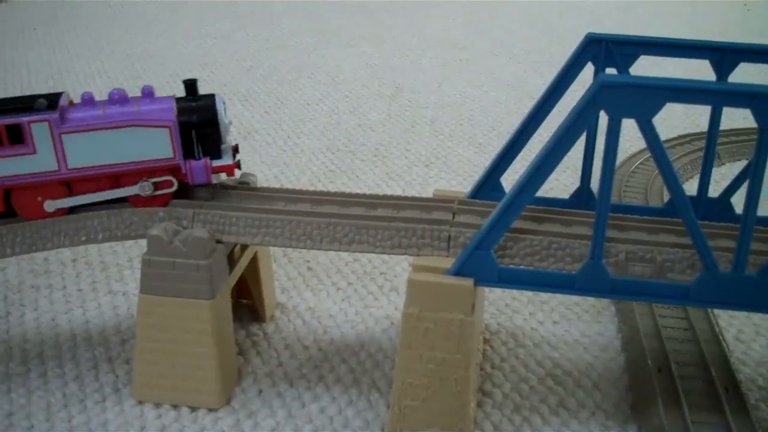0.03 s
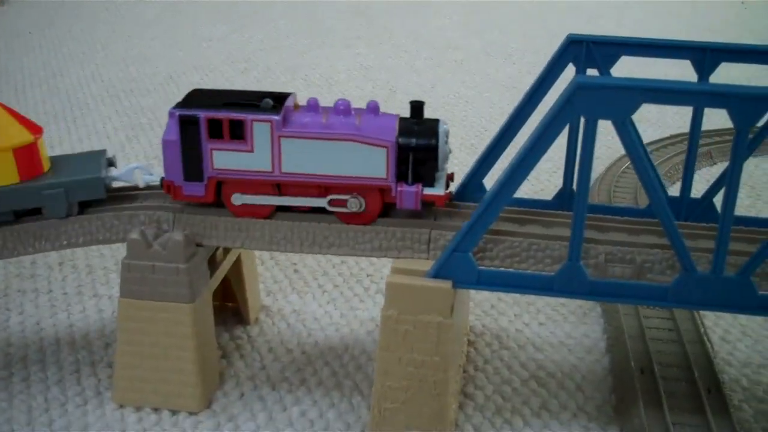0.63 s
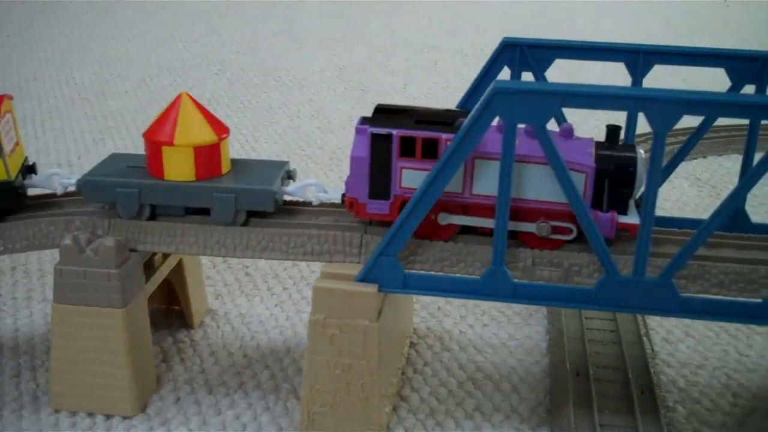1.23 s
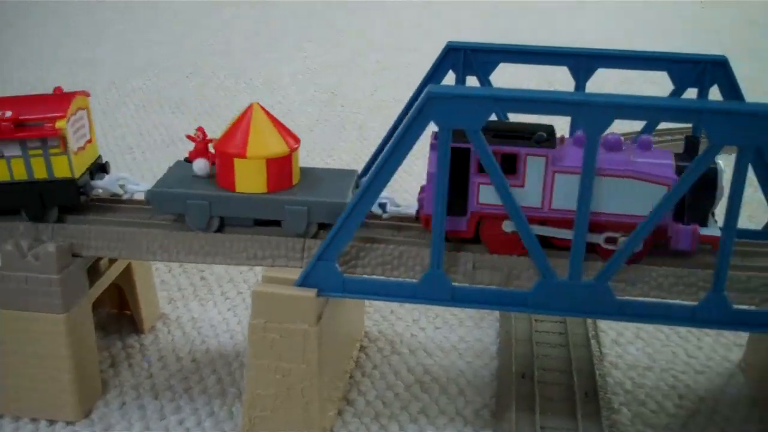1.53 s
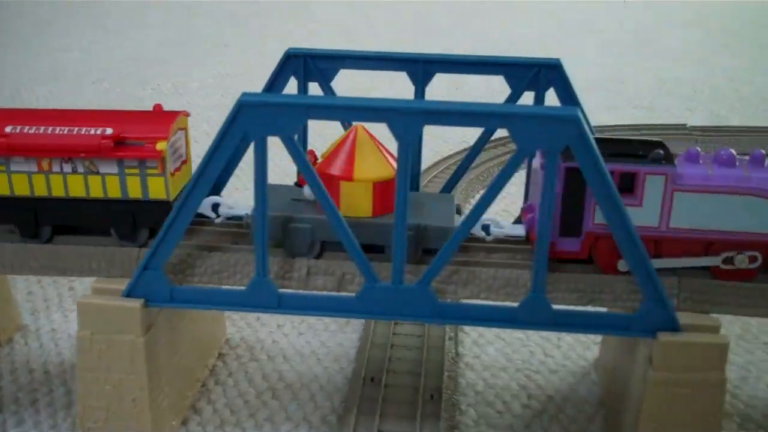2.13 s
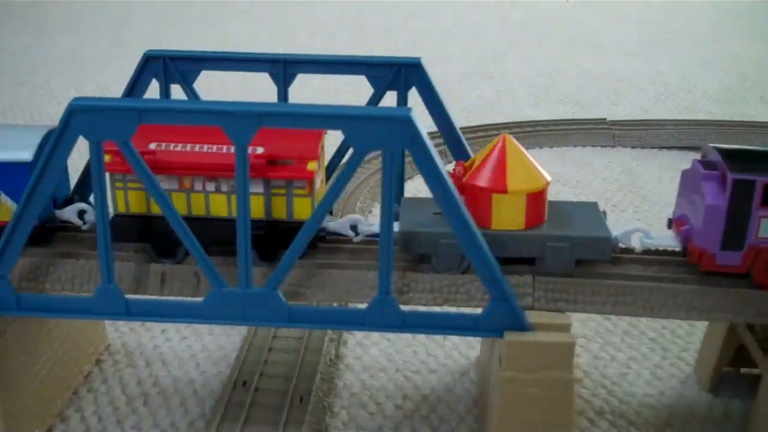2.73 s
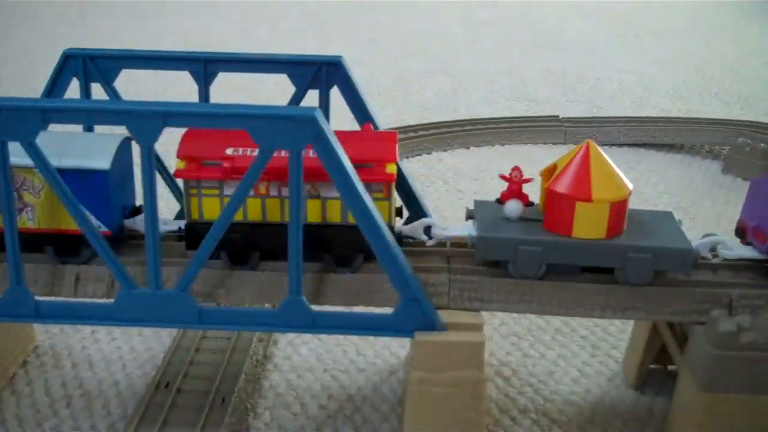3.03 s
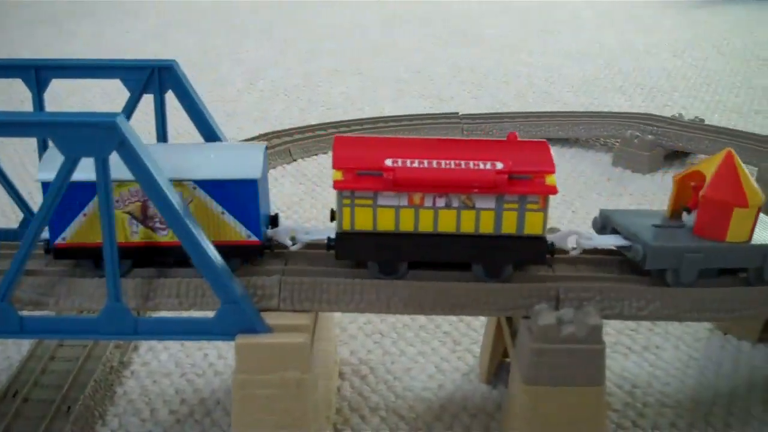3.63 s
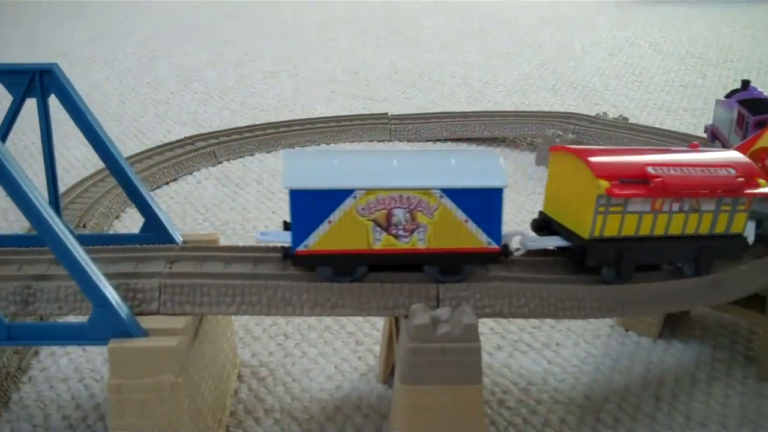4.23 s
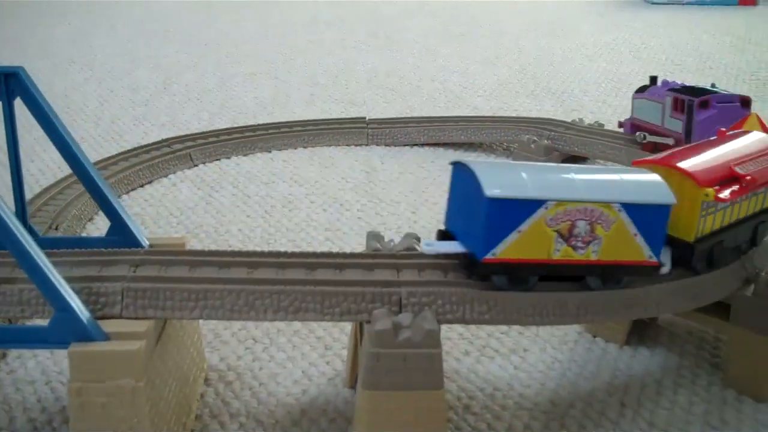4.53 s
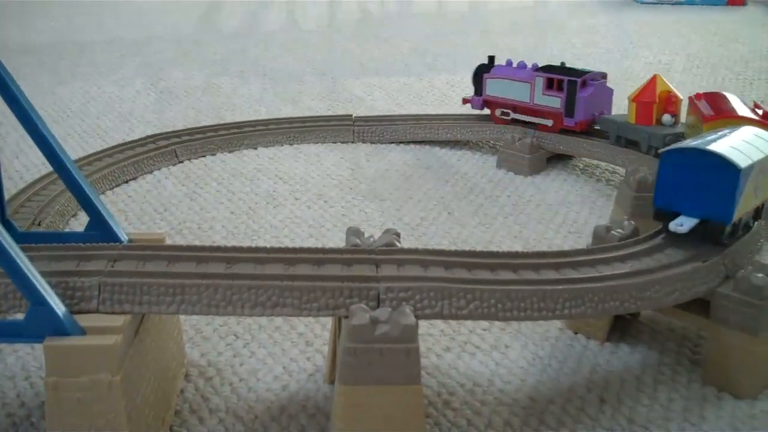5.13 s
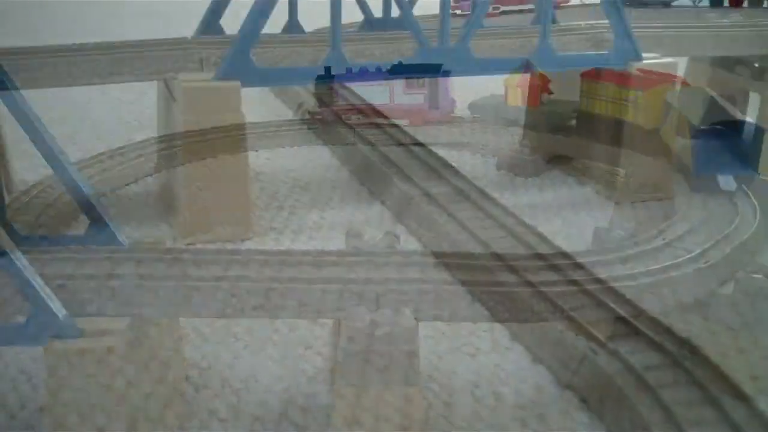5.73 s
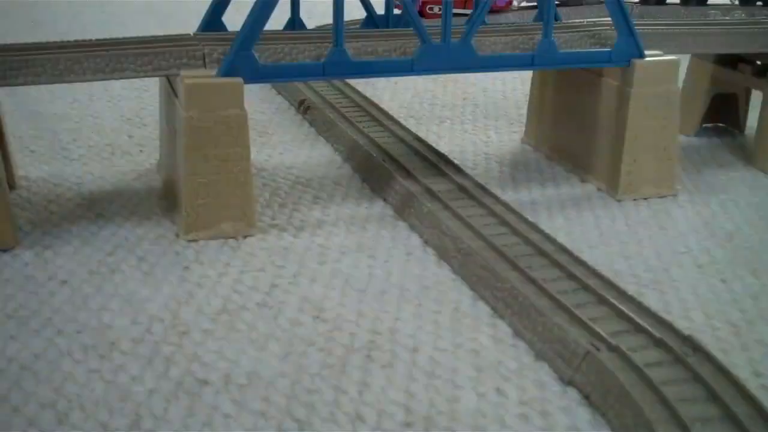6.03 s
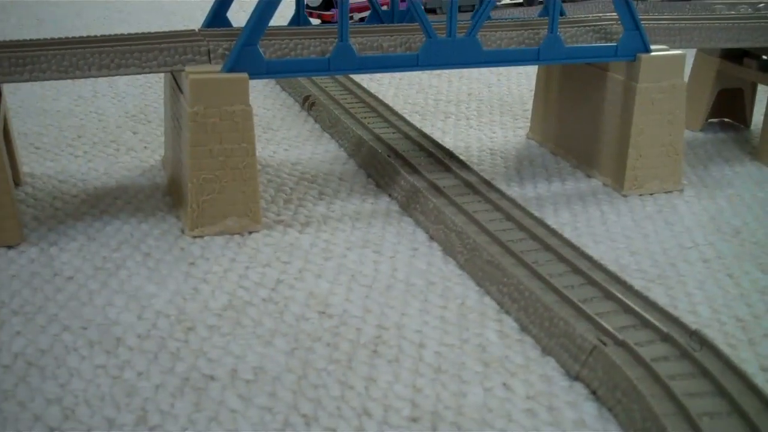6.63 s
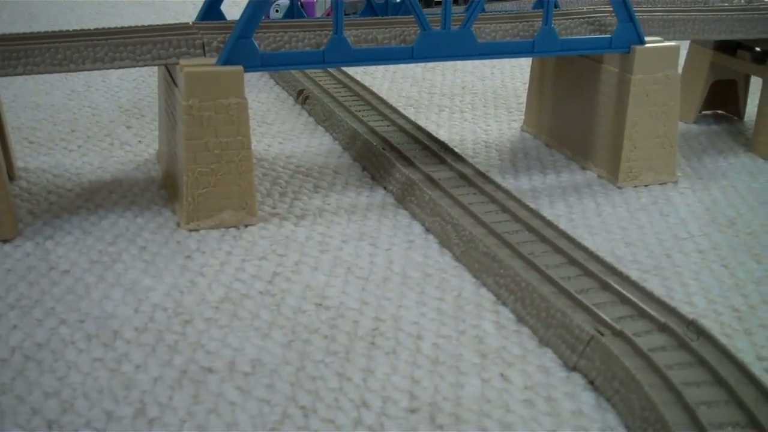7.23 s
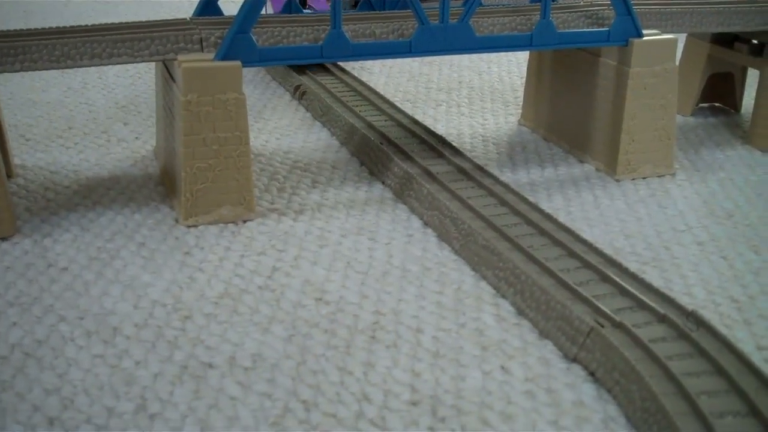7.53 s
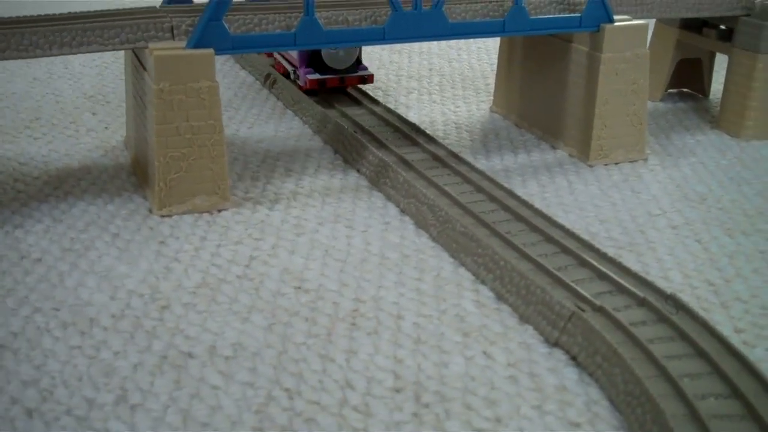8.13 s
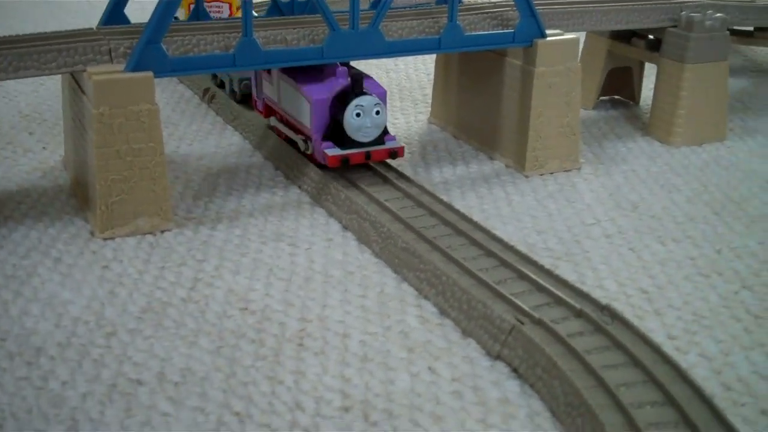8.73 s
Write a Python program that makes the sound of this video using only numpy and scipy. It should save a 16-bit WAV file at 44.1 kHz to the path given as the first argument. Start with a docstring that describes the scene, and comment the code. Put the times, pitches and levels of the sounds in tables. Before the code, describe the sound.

A battery toy train runs on plastic track, close to the microphone in a small carpeted room. At first its gears chatter brightly with a faint, wavering whine over the hollow drone of the track. Then the wagons rattle past, their couplings and wheels clacking irregularly. The wheels grind and tick through a bend, and the train draws away and carries on more quietly, with a few light clicks.

```python
"""A small carpeted room, close to a toy railway bridge.
A battery engine pulls three plastic wagons over it, rounds a bend and comes back underneath.
The hollow track drones; wheels grind on the ribbed rails and flanges tick in the bend.
Up front, loose gear teeth chatter and whine, couplings rattle and the train clacks over the joints.
The rattles and hums are showers of tiny impacts ringing plastic parts."""
import sys
import numpy as np
from scipy import signal
from scipy.fft import rfft, irfft
from scipy.io import wavfile
from scipy.ndimage import uniform_filter1d, minimum_filter1d

SR = 44100
rng = np.random.default_rng(int(sys.argv[2]) if len(sys.argv) > 2 else 0)


def put_to_file(sound):
    """Save the sound as 16-bit audio at rate SR, in the file named by the first command-line argument."""
    columns = np.atleast_2d(sound).T  # one column per channel
    safe = np.clip(columns, -1, 1)
    whole_steps = np.round(safe * 32767)
    wavfile.write(sys.argv[1], SR, whole_steps.astype(np.int16))


N = 396900
TIME = np.arange(N) / SR

# tone curves: f/Hz, level/dB
ROOM_TONE_EQ = [(20, -1), (60, -11), (120, 4), (200, -4), (1000, -22), (8000, -39)]
TRACK_EQ = [(80, -41), (170, -11.5), (260, -2.5), (380, 2.5), (560, -1), (700, 1), (900, -9.5),
            (1100, -0.5), (1400, -2), (2200, 0.5), (6000, -57)]
RAIL_EQ = [(700, -36.5), (1400, -6.5), (1900, -2), (2200, 1), (2600, -0.5), (2950, -0.5), (3400, 2),
           (4100, -1), (4900, 3.5), (5800, -1.5), (8000, -43), (14000, -66)]
WAGON_EQ = [(200, -59), (1200, -29), (2500, -8), (4200, -12), (5400, -7.5), (6200, -4), (6900, -0.5),
            (7500, -1.5), (8200, -4.5), (9200, -13.5), (10500, -19.5), (12000, -36.5), (14000, -41.5)]
# stereo tilt, the right microphone shaded in the treble: f/Hz, left minus right/dB
BALANCE = [(400, 0), (750, -1.5), (1200, 2.5), (2000, 3.5), (3200, 3.5), (4500, 3), (7000, 6), (8600, 3.5),
           (10500, 6.5), (13000, 18.5)]

# resonances of the parts: f/Hz, width/Hz, level/dB
BRIDGE_MODES = [(856, 165, -1.5), (1060, 71, -0.5)]
FRAME_MODES = [(2570, 280, -0.5), (3560, 130, -3.5)]
FLANGE_MODES = [(2570, 110, 1.5), (3540, 210, 1), (4680, 340, 0.5), (10430, 360, -6.5)]
HOOK_MODES = [(2610, 140, -0.5), (3700, 600, -6), (6100, 1040, -1.5), (7400, 840, 0.5)]
SHELL_MODES = [(1158, 75, 3.5), (1302, 37, -0.5), (2152, 240, -0.5)]
NOSE_MODES = [(1628, 143, 0)]
GEARBOX_MODES = [(3650, 270, -14.5), (5700, 370, -9.5), (6440, 370, -2), (6970, 440, 1.5),
                 (7730, 740, -7.5), (7950, 360, -8)]

# fader rides: t/s, level/dB
DRONE_FADER = [(0, -39.5), (2.4, -40), (4.7, -37.5), (5.6, -42), (9, -39.5)]  # track and piers, softer with the train behind the bridge
BRIDGE_FADER = [(1.8, -45), (2.6, -41), (5, -40.5), (6.4, -52.5)]  # up while the train is on it
ROLL_FADER = [(0, -28.5), (.8, -27), (1.2, -26), (2.2, -24.5), (3.6, -28.5), (4.2, -27), (4.85, -22.5),
              (5.4, -31), (6.9, -36), (8.4, -34.5), (9, -33)]  # wheels grind hardest in the bend
FRAME_FADER = [(0, -46), (2.5, -31), (4.7, -28.5), (5.4, -53), (6.4, -38), (9, -59)]  # wagon frames passing close
SHELL_FADER = [(0, -41.5), (2.6, -41), (5.85, -43.5), (6.25, -37), (9, -35.5)]  # up when the engine faces the listener
NOSE_FADER = [(0, -47.5), (2.7, -42), (5.5, -44), (7.2, -41), (8.8, -37)]  # up as the engine emerges from under the bridge
CHATTER_FADER = [(0, -16.5), (.8, -17), (1.6, -18.5), (2.2, -19.5), (2.6, -22), (3.3, -23.5), (4.0, -23.5),
                 (4.5, -22.5), (5.0, -23), (5.45, -28.5), (6.3, -29.5), (7.4, -30.5), (8.4, -31.5),
                 (9, -28.5)]  # gears and rattle fade as the train draws away
REVERB_SEND = [(0, -2), (4, -8), (6, -5), (9, -3)]  # driest with the train nearest

# drive speed, slow on the climb: t/s, gear rate/Hz
GEAR_SPEED = [(0, 55.5), (.1, 53.6), (.28, 52.1), (.5, 54.4), (.62, 58.5), (.9, 57.8), (1.4, 60.3),
              (1.7, 61.4), (2.2, 60.7), (4.5, 59.5), (6.2, 62.5), (9, 60.5)]
# how unevenly the wagons shake: t/s, spread/dB
SHAKE = [(0, 2.7), (2.3, 4.5), (3.6, 6.2), (4.7, 5.3), (9, 3.0)]
# crossfade as the engine passes, then the wagons: t/s, gears' share of the chatter/0-1
GEAR_SHARE = [(0, 0.82), (1.2, 0.83), (2.2, 0.5), (2.8, 0.1), (6, 0), (9, 0.21)]
# bearing of the train: t/s, left lag/samples
BEARING = [(0, -0.5), (2.2, 2), (3.5, 2.5), (6, 3.5), (9, 1)]

# couplings snatch (+) or go slack (-): start/s, length/s, rattle change/dB
JERKS = [(0.227, 0.087, 2), (0.544, 0.043, -1.5), (0.64, 0.11, 2), (1.595, 0.028, -7),
         (1.723, 0.028, -10.5), (2.433, 0.032, -3), (2.492, 0.072, 3.5), (2.905, 0.11, 2.5),
         (3.14, 0.064, 4), (3.37, 0.093, 4), (3.534, 0.019, -10.5), (3.548, 0.023, 6.5),
         (3.898, 0.037, 5.5), (4.094, 0.078, 4.5), (4.185, 0.039, -5), (4.426, 0.063, 3),
         (4.55, 0.036, 4.5), (4.622, 0.043, -5), (5.193, 0.053, -8), (5.312, 0.065, 2.5), (6.3, 0.1, -4),
         (7.65, 0.077, -2.5), (8.016, 0.025, -10), (8.91, 0.056, 4)]
# wheels rub along a rail: middle/s, half length/s, f/Hz, level/dB
RUBS = [(1.132, 0.25, 3120, -28.5), (4.534, .14, 10370, -34.5), (6.42, 0.33, 3850, -36)]
# clacks of wheels and couplings: t/s, level/dB, f/Hz
CLACKS = [(1.5722, -5, 6380), (1.888, -5, 7400), (1.9199, -1.5, 6900), (1.9987, -2.8, 6820),
          (2.2731, 0, 7380), (2.3419, -4, 7210), (2.3733, -4.5, 7150), (2.392, -7, 3100), (2.405, -6, 3300),
          (2.5784, -3.5, 6840), (2.8213, -4.5, 6740), (2.9455, -5, 5800), (2.973, -4.5, 6610),
          (2.989, -5, 6900), (3.0304, -3.5, 7170), (3.1231, -3, 6850), (3.2239, -4, 6750),
          (3.2309, -3, 7340), (3.3451, -1, 6900), (3.396, -5, 6800), (3.5153, -1.5, 6300),
          (3.6335, -7, 6350), (3.644, -4.5, 6620), (3.7138, -6, 6800), (3.7542, -1.5, 6400),
          (3.8151, -4, 7300), (3.9193, -4, 6170), (3.9328, -3.5, 7000), (3.946, -5, 6900),
          (4.067, -5.5, 6830), (4.1274, -5, 6550), (4.1488, -3.5, 6850), (4.162, -5, 7300),
          (4.3114, 0.5, 6890), (4.329, -4.5, 7100), (4.4038, -7, 4710), (4.5873, -3.5, 7000),
          (4.754, -9, 2570), (4.9351, -9, 2570), (4.9885, -5, 4690), (5.1765, -2.8, 7000),
          (5.5546, -10, 6500), (7.2064, -14, 6260), (7.933, -14, 5900), (8.1562, -13.5, 2900),
          (8.3097, -13, 6820), (8.4429, -13.5, 5210), (8.6589, -13, 4700), (8.7427, -12, 6830)]
# gears sing under load: middle/s, half length/s, harmonic of the tooth rate, level/dB
SQUEALS = [(.24, 0.48, 3, -33), (.26, 0.43, 4, -32), (0.266, 0.049, 4, -28), (0.273, 0.088, 2, -31),
           (.29, .08, 6, -27.5), (.64, 0.061, 2, -33.5), (0.848, .12, 2, -36), (1.66, 0.2, 2, -30.5),
           (2.03, 0.23, 2, -34), (7.498, .13, 2, -37), (7.98, 0.27, 2, -41.5)]

TEETH = 18
ROLL_FOLLOWS, TRACK_FOLLOWS, SHELL_FOLLOWS = 0.63, 0.12, 0.64  # share of a jerk's dB each one gets
GEAR_LURCH_DB, RATTLE_LURCH_DB, TRACK_LURCH_DB = 0.8, 1.37, 2.5  # the heavy engine lurches least


def from_db(db):
    return 10 ** (np.asarray(db) / 20)


def unit_rms(x):
    return x / np.sqrt(np.mean(x ** 2) + 1e-20)


def ride(curve):
    """An automation curve at every sample."""
    return np.interp(TIME, *np.transpose(curve))


def swell(middle_s, half_s, edge_db=-9):
    """A bell-shaped fade in and out."""
    return from_db(edge_db * np.minimum(((TIME - middle_s) / half_s) ** 2, 10))


def drift(rate):
    """Smooth random wobble of unit spread, changing about rate times a second."""
    r = np.exp(-20 * np.pi * rate / SR)
    slow = signal.lfilter([1], [1, -2 * r, r * r], rng.standard_normal(N // 10 + 4002))[4000:]
    return np.interp(np.arange(N) / 10, np.arange(len(slow)), unit_rms(slow))


def bandpass(x, low_hz, high_hz, order=2):
    return signal.sosfilt(signal.butter(order, [low_hz, high_hz], "band", fs=SR, output="sos"), x)


def eq(x, curve, size=4096):
    """Minimum-phase EQ that follows a tone curve."""
    hz, db = np.transpose(curve)
    grid = np.maximum(np.fft.rfftfreq(size, 1 / SR), 1)
    cepstrum = irfft(np.log(from_db(np.interp(np.log(grid), np.log(hz), db))))
    cepstrum[1:size // 2] *= 2
    cepstrum[size // 2 + 1:] = 0
    return signal.oaconvolve(x, irfft(np.exp(rfft(cepstrum))))[:N]


def resonate(x, modes):
    """Parallel resonators of alternating polarity."""
    out = 0
    for k, (hz, width, db) in enumerate(modes):
        r = np.exp(-np.pi * width / SR)
        poles = [1, -2 * r * np.cos(2 * np.pi * hz / SR), r * r]
        ring = signal.lfilter([1, 0, -1], poles, x + 1e-18)
        out = out + (-1) ** k * from_db(db) * (1 - r * r) / 2 * ring
    return out


def contacts(per_s, spread_db):
    """Tiny impacts at random moments with uneven sizes."""
    sizes = from_db(spread_db * np.clip(rng.standard_normal(N), -2, 2)) * rng.choice([-1, 1], N)
    return sizes * (rng.random(N) < per_s / SR)


def steady(x, size=2600):
    """Levels a texture over some 60 ms and keeps its grain."""
    return x / np.sqrt(np.maximum(uniform_filter1d(x * x, size), 0) + 1e-12)


def small_parts(clicks, low_hz, high_hz, width_hz, count=24):
    """Each click lands on one of many small parts, each with its own pitch."""
    at = np.flatnonzero(clicks)
    part = rng.integers(0, count, len(at))
    out = np.zeros(N)
    for k, hz in enumerate(np.linspace(low_hz, high_hz, count)):
        own = np.zeros(N)
        own[at[part == k]] = clicks[at[part == k]]
        out += resonate(own, [(hz, width_hz, 0)])
    return unit_rms(out)


def hum(modes, jolt_db):
    """A hollow body shaken by the rolling."""
    knocks = contacts(per_s=2000, spread_db=2.5) * from_db(0.35 * jolt_db)
    softened = eq(knocks, [(300, -8.5), (800, -2), (2800, 0.0), (6000, -13.5)])
    return steady(resonate(softened, modes))


def jerks(ramp_s=0.032):
    """The rattle's change in dB as each jerk builds and lets go."""
    return sum(db * np.clip(np.minimum(TIME - s, s + length - TIME) / ramp_s + .5, 0, 1)
               for s, length, db in JERKS)


def place(x, lag, send_db, room_t60_s=0.44, early_t60_s=0.017, size=8192):
    """Direct sound at two close microphones, plus reflections that shift as the train moves on."""
    left = np.interp(4 * (np.arange(N) - lag), np.arange(4 * N), signal.resample_poly(x, 4, 1))
    t = TIME[:size]
    fade = (from_db(-60 * t / room_t60_s) + 5.1 * from_db(-60 * t / early_t60_s)) * (t > .0006)
    fade /= np.linalg.norm(fade)
    window = np.sin(np.pi * np.arange(size) / size)
    padded, room = np.pad(x, size), np.zeros((2, N + 3 * size))
    for i in range(0, N + size, size // 2):
        echoes = rng.standard_normal((2, size)) * fade
        grain = padded[i:i + size] * window
        room[:, i:i + 2 * size] += irfft(rfft(grain, 2 * size) * rfft(echoes, 2 * size))
    wet = from_db(send_db)
    return (np.array([left, x]) + wet * room[:, size:size + N]) / np.sqrt(1 + wet ** 2)


def room_tone():
    """A faint, dark bed of air."""
    return from_db(-68.5) * unit_rms(eq(rng.standard_normal(N), ROOM_TONE_EQ))


def track_drone():
    """Rolling impacts blur into a drone in the hollow track and a hum in the bridge."""
    drone = unit_rms(eq(contacts(per_s=5000, spread_db=2.0), TRACK_EQ))
    return from_db(ride(DRONE_FADER)) * drone + from_db(ride(BRIDGE_FADER)) * hum(BRIDGE_MODES, 0)


def engine_body(jolt_db):
    """The engine's shell and nose hum with a wavering level."""
    shell = from_db(ride(SHELL_FADER)) * hum(SHELL_MODES, jolt_db)
    nose = from_db(ride(NOSE_FADER)) * hum(NOSE_MODES, jolt_db)
    return from_db(1.3 * drift(8.5)) * (shell + nose)


def frames(jolt_db):
    """The wagon frames hum, pulsing with each jolt."""
    return from_db(ride(FRAME_FADER) + .5 * jolt_db) * hum(FRAME_MODES, jolt_db)


def rubs(jolt_db, width_hz=480):
    """A rubbing wheel sticks and slips in quick ticks that set it ringing."""
    slips = contacts(per_s=1500, spread_db=5.0) * from_db(jolt_db)
    out = np.zeros(N)
    for s, half, hz, db in RUBS:
        ring = resonate(slips, [(hz, width_hz, 0)])
        out += from_db(db) * swell(s, half) * steady(resonate(ring, [(hz, 2 * width_hz, 0)]))
    return out


def flanges(jolt_db, bend_s=4.59, spread_s=0.51):
    """In the bend the flanges catch the outer rail in dry, uneven ticks."""
    ticks = contacts(per_s=400, spread_db=9.5) * from_db(jolt_db)
    ringing = steady(bandpass(resonate(ticks, FLANGE_MODES), 1500, 11000))
    in_bend = np.exp(-((TIME - bend_s) / spread_s) ** 2 / 2)
    return from_db(-27) * in_bend * ringing


def wheels(jolt_db):
    """Dense grit from the wheels on the ribbed rails."""
    grains = contacts(per_s=6000, spread_db=4.0) * from_db(0.43 * jolt_db)
    ringing = small_parts(grains, low_hz=1240, high_hz=6400, width_hz=370)
    return from_db(ride(ROLL_FADER)) * steady(eq(ringing, RAIL_EQ))


def couplings(jerk_db):
    """Loose hooks tick singly against their eyes, more often when the train snatches."""
    ticks = contacts(per_s=260, spread_db=1.0) * (rng.random(N) < .3 * from_db(jerk_db))
    return from_db(-7) * unit_rms(bandpass(resonate(ticks, HOOK_MODES), 1800, 8200, order=3))


def wagons(jolt_db):
    """Axles and couplings tick in bright clumps as the wagons shake."""
    ticks = contacts(per_s=1700, spread_db=3.5) * from_db(jolt_db)
    return steady(eq(small_parts(ticks, low_hz=2260, high_hz=12400, width_hz=890), WAGON_EQ))


def clacks(width_hz=700, crack_db=-11.5, full_hit_t60_s=.013):
    """A part buzzes briefly against its stop, over a broader crack from the body."""
    hits, t = np.zeros(N), TIME[:SR // 25]
    for s, db, hz in CLACKS:
        buzz = rng.standard_normal(len(t))
        age = t / from_db(.25 * db)  # light hits die sooner
        attack = np.minimum(age / .0007, 1)
        decay = from_db(-60 * np.maximum(age - .0015, 0) / full_hit_t60_s)
        ring = eq(resonate(buzz, [(hz, width_hz, 0)]) + from_db(crack_db) * buzz, WAGON_EQ)[:len(t)]
        swing = ring / (np.abs(signal.hilbert(ring)) + 1e-12)  # the stop bounds the swing
        start = int(s * SR)
        hits[start:start + len(t)] += from_db(db) * attack * decay * swing
    return bandpass(hits, 1800, 8000)  # tiny parts give no bass; soft plastic dulls the top


def gear_whine(turns):
    """Tooth-rate harmonics swell into squeals; play in the gears makes them waver and chatter."""
    mesh = 2 * np.pi * TEETH * turns + .12 * drift(25)
    tones = {}
    for k in sorted({round(row[2]) for row in SQUEALS}):
        wavering = np.sin(k * mesh + .14 * (k + 3) * drift(60))
        tones[k] = unit_rms(wavering * from_db(5 * np.tanh(drift(60))))
    return sum(from_db(db) * swell(s, half) * tones[round(k)] for s, half, k, db in SQUEALS)


def gearbox(turns, throb_db=5, motor_ratio=5.3, motor_db=2.0, tooth_db=4.5):
    """Loose teeth slap hardest once a turn and flutter at the motor and tooth rates."""
    angle = 2 * np.pi * turns
    flutter_db = motor_db * np.cos(motor_ratio * angle) + tooth_db * np.cos(TEETH * angle)
    load_db = throb_db * np.cos(angle) + flutter_db
    slaps = contacts(per_s=6300, spread_db=5.5) * from_db(load_db + drift(38))
    return steady(bandpass(resonate(slaps, GEARBOX_MODES), 2200, 9500))


def scene():
    """The mix: shared jolts, jerks and lurches tie the layers into one moving train."""
    turns = np.cumsum(ride(GEAR_SPEED)) / SR
    share = np.clip(ride(GEAR_SHARE), 0, 1)
    jerk_db = jerks()
    jolt_db = ride(SHAKE) * np.tanh(drift(71) / 1.9)  # loose parts shake as one, within their play
    lurch = np.tanh(drift(10.6))  # the train lurches from rib to rib

    gears = np.sqrt(share) * from_db(GEAR_LURCH_DB * lurch) * gearbox(turns)
    rattle = wagons(jolt_db) + couplings(jerk_db)
    rattle *= np.sqrt(1 - share) * from_db(RATTLE_LURCH_DB * lurch)
    chatter = from_db(ride(CHATTER_FADER) + jerk_db) * (gears + rattle)
    rolling = wheels(jolt_db) + frames(jolt_db) + flanges(jolt_db) + rubs(jolt_db)
    rolling *= from_db(ROLL_FOLLOWS * jerk_db + RATTLE_LURCH_DB * lurch)
    engine = from_db(SHELL_FOLLOWS * jerk_db) * engine_body(jolt_db) + gear_whine(turns)
    track = from_db(TRACK_FOLLOWS * jerk_db + TRACK_LURCH_DB * lurch) * track_drone()
    air = room_tone()

    lag, send_db = ride(BEARING), ride(REVERB_SEND)
    pair = (place(chatter, lag, send_db + 3.5)
            + place(rolling + engine + clacks(), lag, send_db)
            + place(track, lag, send_db=-10.0)
            + place(air, 0, send_db=4.0))
    return np.array([eq(channel, [(hz, side * db / 2) for hz, db in BALANCE])
                     for channel, side in zip(pair, (1, -1))])


def record(dry, ceiling=.97, size=25, cutoff_hz=14330):
    """A fast peak limiter, then a steep high cut."""
    allowed = np.minimum(1, ceiling / (np.abs(dry).max(axis=0) + 1e-9))
    limited = dry * uniform_filter1d(minimum_filter1d(allowed, size), size)
    return signal.sosfilt(signal.ellip(10, .1, 80, cutoff_hz, fs=SR, output="sos"), limited)


dry = scene()
out = record(dry)
put_to_file(out)
```